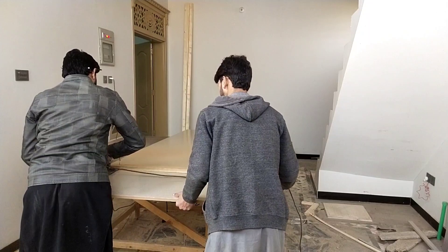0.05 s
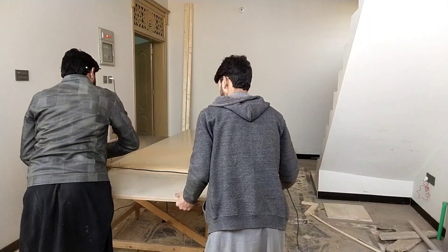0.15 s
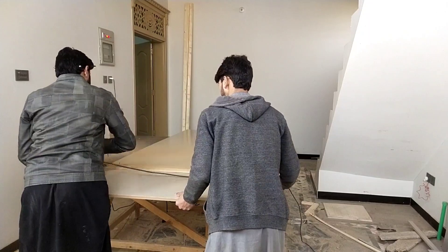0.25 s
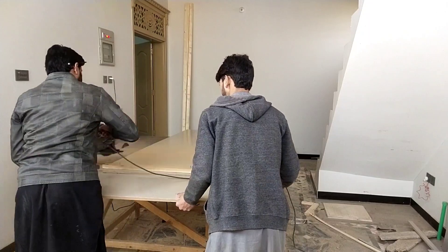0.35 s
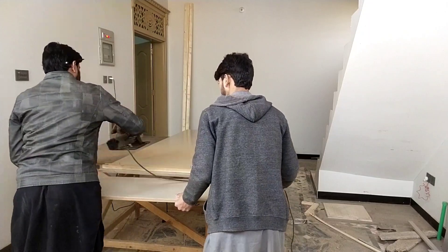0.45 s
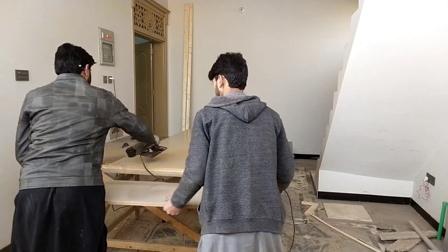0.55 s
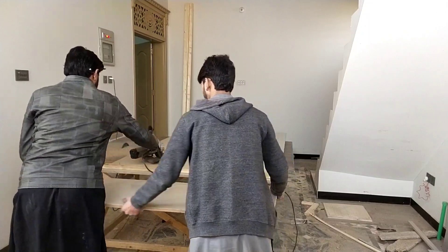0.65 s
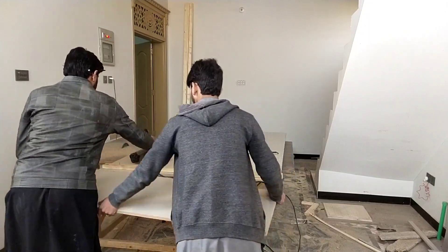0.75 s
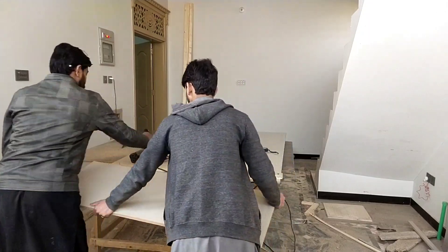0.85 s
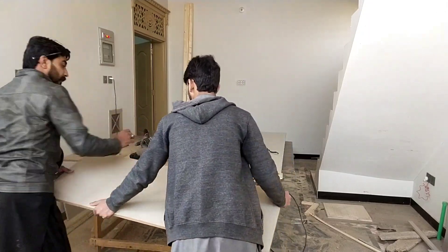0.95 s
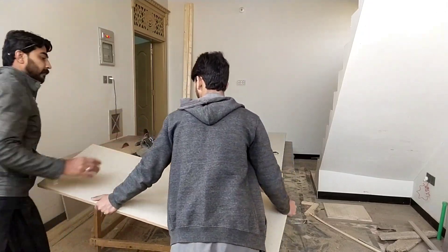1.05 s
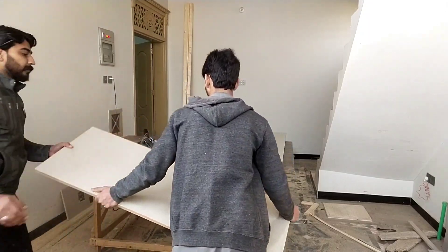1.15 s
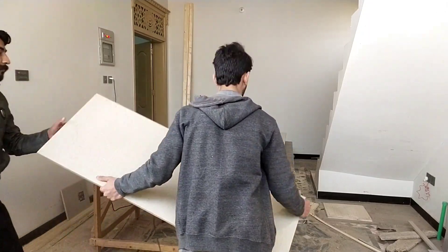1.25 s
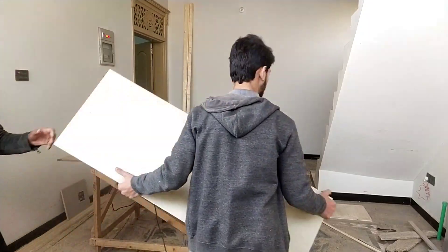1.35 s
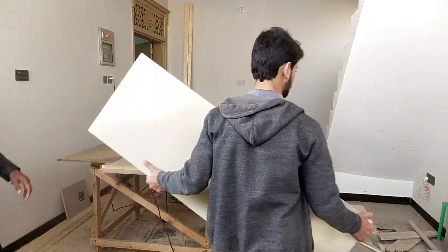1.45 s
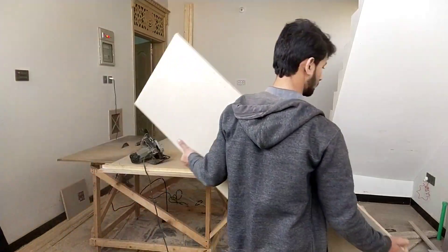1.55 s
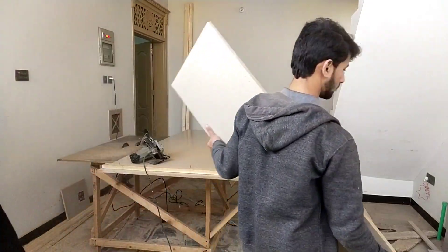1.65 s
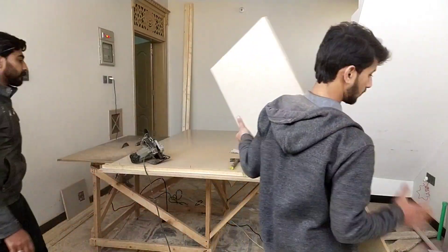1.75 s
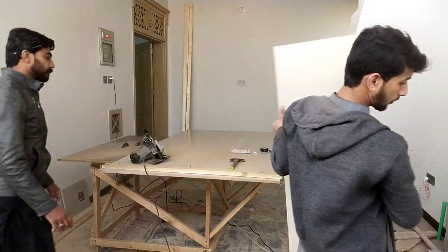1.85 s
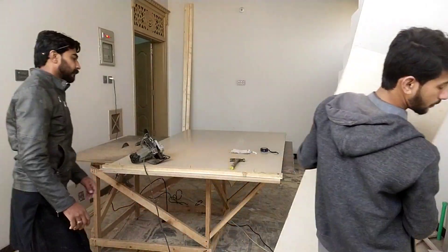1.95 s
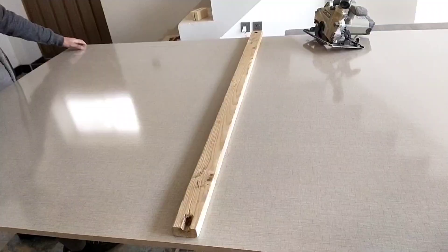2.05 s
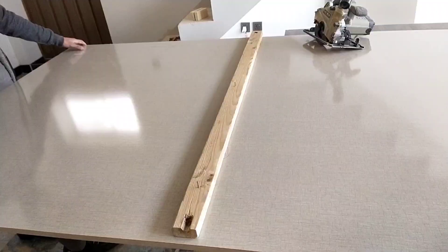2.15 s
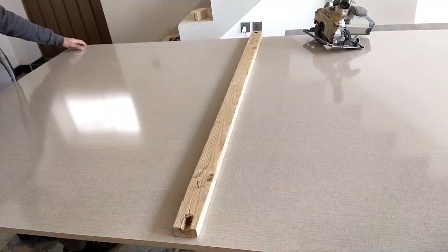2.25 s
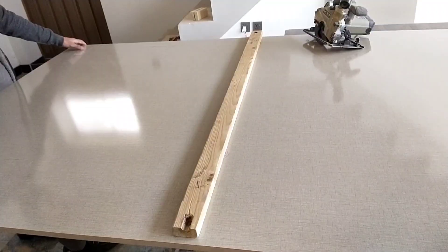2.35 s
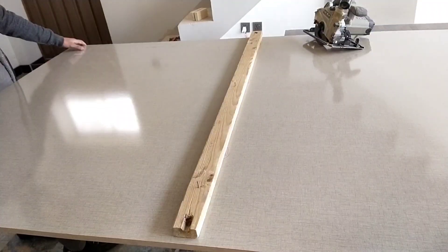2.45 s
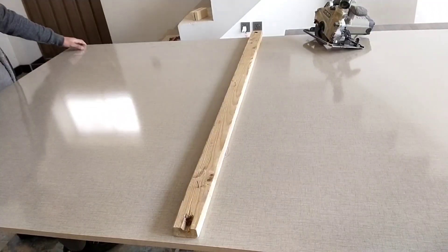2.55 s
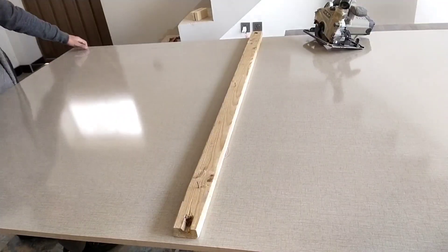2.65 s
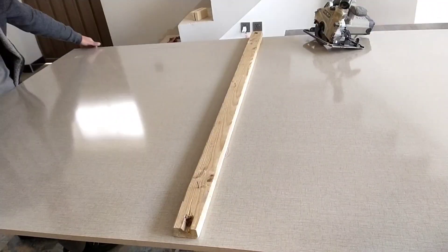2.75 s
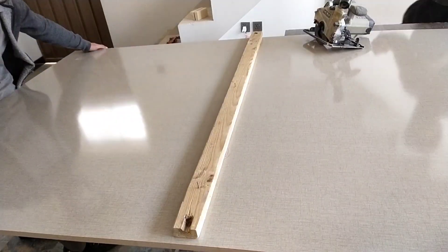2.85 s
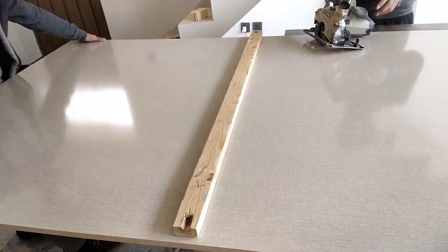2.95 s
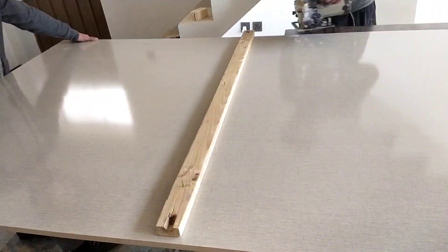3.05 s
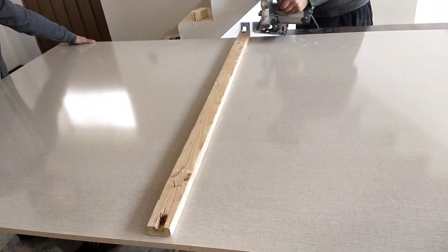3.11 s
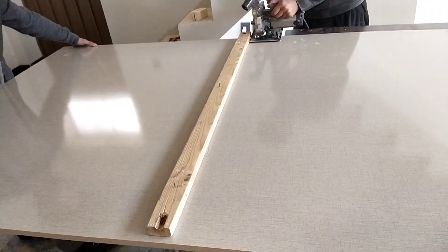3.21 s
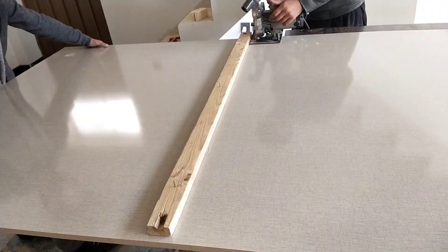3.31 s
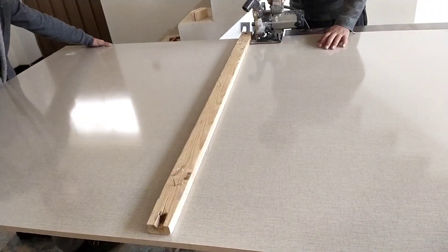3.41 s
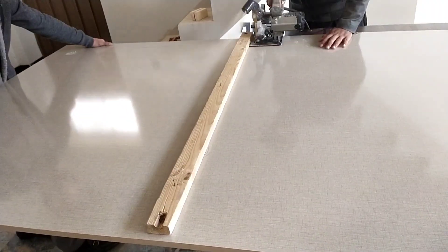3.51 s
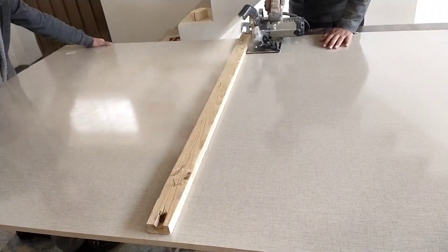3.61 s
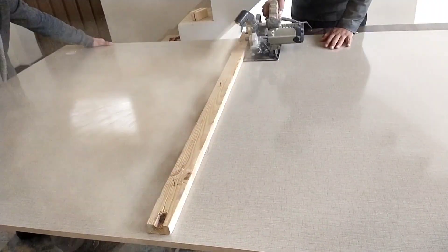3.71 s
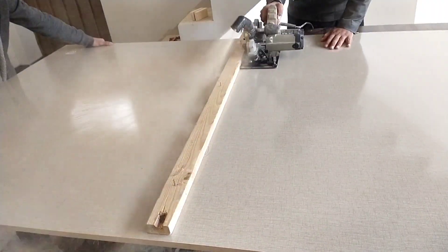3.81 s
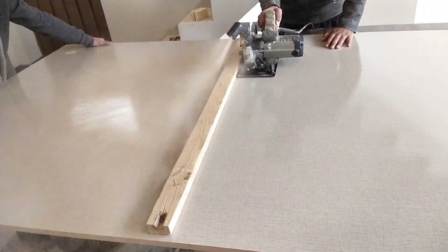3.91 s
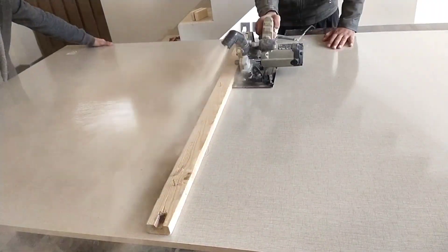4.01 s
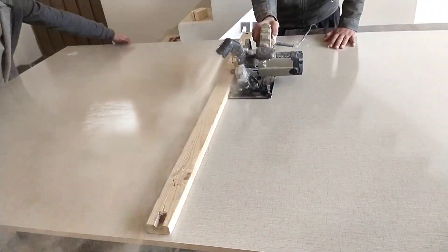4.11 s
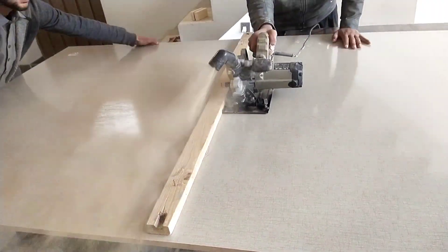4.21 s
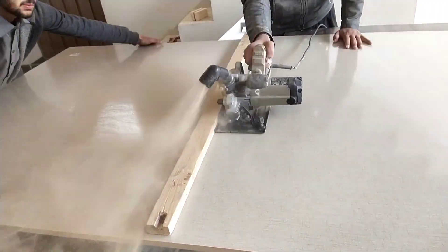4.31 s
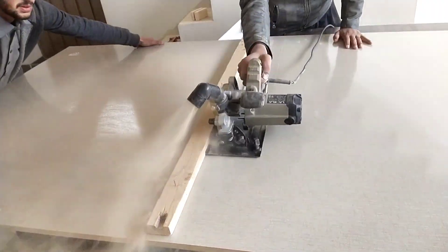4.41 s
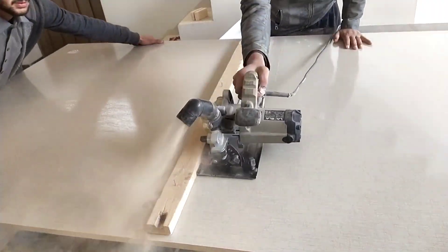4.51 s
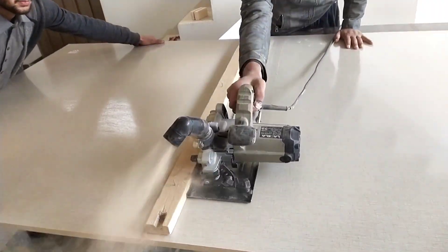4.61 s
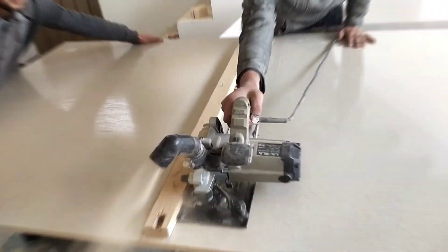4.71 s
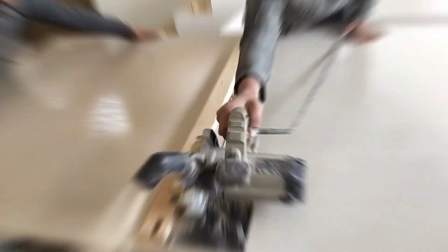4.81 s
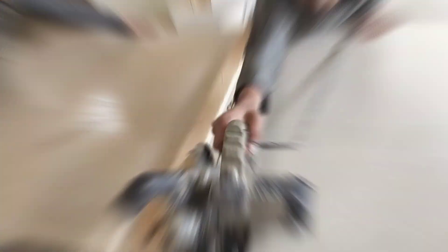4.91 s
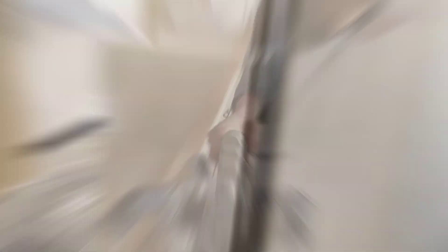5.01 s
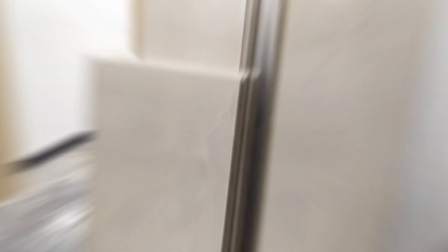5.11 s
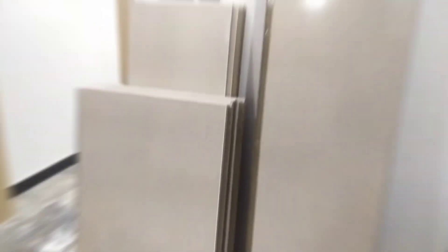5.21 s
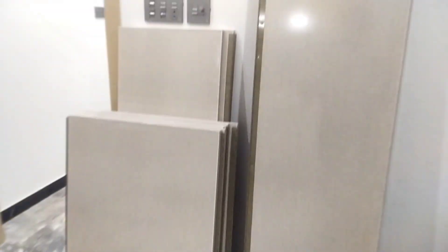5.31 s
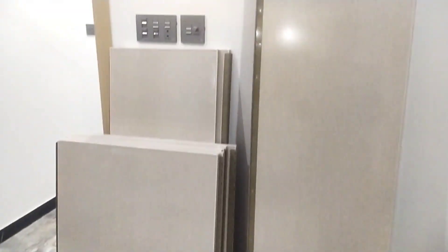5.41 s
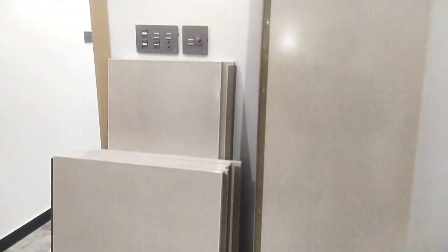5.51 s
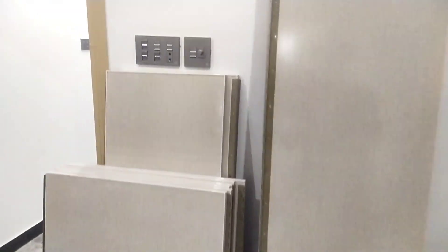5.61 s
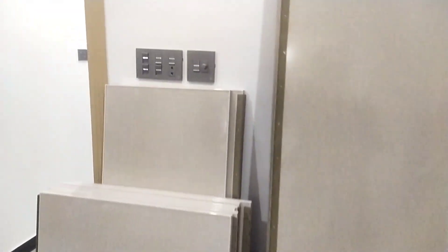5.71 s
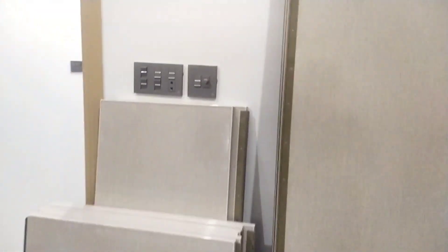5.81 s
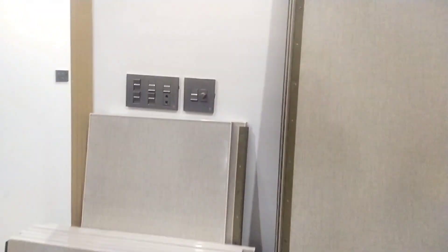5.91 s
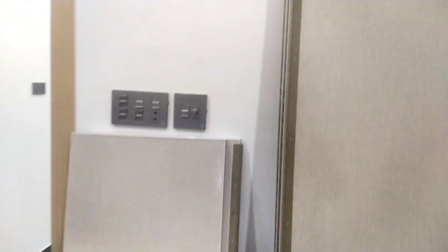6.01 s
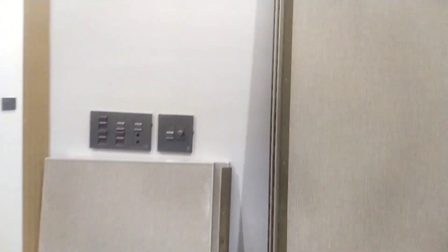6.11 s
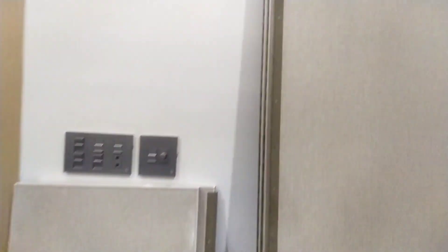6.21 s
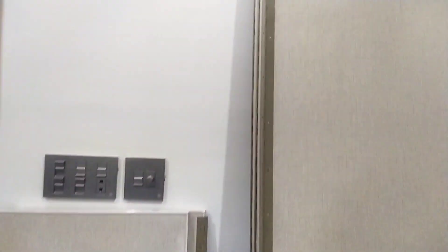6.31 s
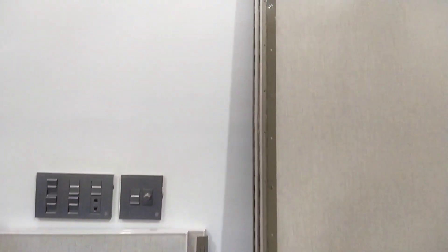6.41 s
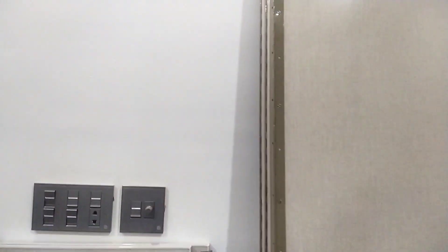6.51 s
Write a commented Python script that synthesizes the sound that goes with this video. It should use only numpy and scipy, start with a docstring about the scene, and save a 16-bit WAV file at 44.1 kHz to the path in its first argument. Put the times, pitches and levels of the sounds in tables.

```python
"""A hand-held circular saw is modelled as tooth-strike noise exciting panel and blade modes, with shaft-order tones.
It finishes a cut in a bare room and coasts on fan rush and gear rattle while the panel is carried off in rumbling noise.
The scene changes abruptly: swept sines chirp as a faint bird, noise bursts clatter as the saw meets the panel, and it
starts and cuts through: teeth rasp, the panel rumbles, the steel blade sings. It coasts again, a board thumps as
a decaying sine, and a sharp clack rings through the room over quiet noise."""
import sys
import numpy as np
from scipy import signal
from scipy.fft import rfft, irfft, next_fast_len
from scipy.io import wavfile
from scipy.ndimage import map_coordinates

SR = 44100
rng = np.random.default_rng(int(sys.argv[2]) if len(sys.argv) > 2 else 0)


def transcribe(signal):
    """Save signal, clipped to [-1, 1], as a 16-bit WAV file at the path in sys.argv[1]."""
    frames = np.atleast_2d(signal).T
    limited = np.clip(frames, -1, 1)
    pcm = np.round(limited * 32767).astype(np.int16)
    wavfile.write(sys.argv[1], SR, pcm)


N = 289295
T = np.arange(N) / SR  # s


def amp(db):
    """Logarithmic level: decibels to amplitude gain."""
    return np.exp(np.asarray(db) * np.log(10) / 20)


def unit(x):
    """Power normalisation: scale to rms 1."""
    return x / np.sqrt(np.mean(x ** 2) + 1e-20)


def along(points, hz):
    """Logarithmic frequency scale: (f/Hz, value) points interpolated on it."""
    f, v = np.transpose(points)
    return np.interp(np.log(hz + 1), np.log(f + 1), v)


def wobble(rate):
    """Band-limited random process of rms 1: straight lines between `rate` random knots a second."""
    knots = rng.standard_normal(int(N * rate / SR) + 2)
    return unit(np.interp(T * rate, np.arange(len(knots)), knots))


def noise():
    """Incoherent white noise: two unrelated channels."""
    return rng.standard_normal((2, N))


def pan(left_db):
    """Interchannel level difference: channel gains for left minus right in dB."""
    return amp([[left_db / 2], [-left_db / 2]])


def filtered(x, response):
    """Linear filtering: the spectrum of x times a response of frequency."""
    m = next_fast_len(N + SR // 2)
    spectrum = rfft(x, m) * response(np.fft.rfftfreq(m, 1 / SR))
    return irfft(spectrum, m)[..., :N]


def coloured(x, spectrum):
    """Spectral shaping: x with the given colour, at rms 1."""
    return unit(filtered(x, lambda hz: amp(along(spectrum, hz))))


def swell(s, spread):
    """Gaussian envelope: a bell-shaped rise and fall around a time."""
    return np.exp(-np.minimum(((T - s) / spread) ** 2 / 2, 20))


def envelope(start, length, attack, t60):
    """Exponential decay: attack, hold until length is over, then an even fall in dB."""
    rise = np.clip((T - start) / attack, 0, 1)
    return rise * amp(-60 * np.clip((T - start - length) / t60, 0, 3))


def strokes(rows, attack, t60):
    """Incoherent summation: the powers of hand movements at (t/s, length/s, level/dB) add."""
    power = sum((amp(db) * envelope(s, length, attack, t60)) ** 2 for s, length, db in rows)
    return np.sqrt(power)


def blows(rows, spectrum, t60, lead):
    """Impact excitation: bursts at (t/s, level/dB) grow 60 dB in lead seconds and decay in the struck colour."""
    burst = 0
    for s, db in rows:
        distance = np.maximum((T - s) / t60, (s - T) / lead)
        burst = burst + amp(db - 60 * np.minimum(distance, 2))
    return burst * coloured(noise(), spectrum)


# Reverberation of the bare room: f/Hz, t60/s
REVERBERATION = [(100, 0.74), (500, 0.64), (2500, 0.9), (7000, 0.73), (15000, 1)]


def room(x, wet_db):
    """Reverberation: direct sound plus a tail decaying by frequency, at constant power."""
    hz, t, z = signal.stft(rng.standard_normal((2, SR)), SR, nperseg=256)
    decay = amp(-60 * t / along(REVERBERATION, hz)[:, None])
    tail = signal.istft(z * decay, SR, nperseg=256)[1]
    echo = signal.fftconvolve(np.atleast_2d(x), tail / np.linalg.norm(tail[0]), axes=1)[:, :N]
    return (x + amp(wet_db) * echo) / np.sqrt(1 + amp(2 * wet_db))


FRICTION = 36.4  # steady toll, turns per second lost each second


def shaft_speed(drive, spin_down_s):
    """Rotational dynamics: the loaded speed, then after release exponential drag plus steady friction."""
    release_s, top = drive[-1]
    toll = FRICTION * spin_down_s
    coast = (top + toll) * np.exp(-np.maximum(T - release_s, 0) / spin_down_s) - toll
    return np.where(T < release_s, np.interp(T, *np.transpose(drive)), np.maximum(coast, 1))


def shaft_angle(speed, flutter):
    """Phase accumulation: the slightly unsteady speed integrates to the motor shaft's angle."""
    return 2 * np.pi * np.cumsum(speed * (1 + flutter * wobble(90))) / SR


def whine(angle, width_hz):
    """Narrow-band modulation: random quadrature envelopes smear a tone of rms 1 over a narrow band."""
    return unit(wobble(width_hz) * np.cos(angle) + wobble(width_hz) * np.sin(angle))


TOOTH_ORDER, TEETH = 6.5, 40  # tooth strikes per motor turn, teeth on the blade
HOWL_HZ, HOWL_WIDTH_HZ = 2590, 57  # resonance of the blade in the kerf and its half width
# Colour of the teeth tearing chips: f/Hz, level/dB
RASP_COLOUR = [(240, -32.5), (400, -14), (1040, -11), (1340, -7), (1770, -6), (2750, -1), (3480, -6),
               (5000, -17.5), (5700, -10.5), (7200, -8.5), (8000, -25), (11700, -27.5), (15700, -32),
               (19800, -91)]
# Colour of the shaken panel: f/Hz, level/dB
PANEL_COLOUR = [(21, -68.5), (35, -41), (91, -9), (140, 2.5), (341, -1.5), (415, -1.5), (1030, -8.5),
                (1320, -8), (1800, -17), (2340, -25), (3960, -120)]
# Weaker partials of the loaded motor: multiples of the shaft
LOADED_MOTOR_ORDERS = [8, 9, 11, 12]


def cutting(rasp, rumble, ring, angle, place_s, teeth_db, fan_db):
    """Forced vibration: teeth tear chips from the panel; their strikes shake it and ring the blade."""
    tooth = TOOTH_ORDER * angle
    speed = np.gradient(angle) * SR / (2 * np.pi)  # turns per second
    # the blade runs slightly out of true and the wood resists unevenly
    bite = (1 + 0.024 * np.sin(tooth / TEETH)) * amp(0.84 * wobble(48))
    strikes = bite * (1 + 0.56 * np.cos(tooth))
    chips = rasp * coloured(strikes * noise(), RASP_COLOUR) * pan(2.0)
    shaking = bite * amp(1.4 * wobble(170) + 1.1 * wobble(35))
    panel = rumble * coloured(shaking * noise(), PANEL_COLOUR) * pan(-6.0)
    blade = steel(ring, strikes * noise(), speed, place_s, swell_db=2.5)
    # the tooth note swells when the load drags it down into the resonance
    resonance = 1 / np.hypot(1, (TOOTH_ORDER * speed - HOWL_HZ) / HOWL_WIDTH_HZ)
    teeth = amp(teeth_db) * resonance * np.sqrt(rasp * rumble) * whine(tooth, width_hz=370)
    clear_note = amp(-8.5) * ring * whine(tooth, width_hz=80)
    # the fan whine grows with speed
    fan = amp(fan_db) * ring * (speed / speed.max()) ** 5 * whine(10 * angle, width_hz=60)
    motor = amp(-22) * ring * sum(whine(k * angle, width_hz=30) for k in LOADED_MOTOR_ORDERS)
    return chips + panel + blade + room(teeth + clear_note + fan + motor, wet_db=1.0)


# Modes of the steel blade, gripped differently along the cut:
# f/Hz, width/Hz, then relative level/dB on entry, under heavy load, midway, at the far edge
BLADE_MODES = [(3250, 17, 7, -2.5, 2.5, 6.5), (3560, 66, -15, -14, -15.5, -1.5), (4268, 54, 5, -4, 2, 5),
               (4480, 50, -1.5, -20, -7.5, -8.5), (4800, 110, -2.5, -18, -20, 0.5),
               (5040, 86, -17, -7, -27, -0.5), (5620, 65, 1.5, 5, 1.5, -14),
               (6110, 110, -0.5, -9.5, -4, -7.5), (6310, 400, -2, -3, -10.5, 1.5),
               (6710, 130, -6, 0, -6.5, -7), (7060, 95, 7, -0.5, 4.5, 3.5),
               (7475, 130, 0.5, -3.5, -1.5, -4), (8170, 33, -2, 2.5, -6.5, 0.5),
               (8730, 150, -1, -2, -1.5, 0), (9540, 100, -2.5, -3.5, -4, -1.5),
               (10270, 210, 1, -4, 1.5, -2.5), (11240, 110, -5, -8.5, -10.5, -4),
               (11350, 60, -12, -18, -11.5, -2), (11940, 110, -0.5, -4, 7.5, 3),
               (12650, 120, -4, -8, -10.5, -4), (13200, 140, -3.5, -5.5, -4.5, -0.5),
               (13500, 140, -5, 2.5, -2.5, 3), (14270, 110, -3, -6, -4.5, -5.5),
               (14660, 90, -9, -11, -9.5, -5.5), (15020, 78, -6, -10, 1.5, -2.5),
               (15540, 100, -4.5, -15.5, -11.5, -11)]
# When the blade reaches those four places: t/s
PLACE_TIMES = [3.53, 3.85, 4.7, 5.15]
# The guard throws the modes to different sides: f/Hz, left minus right level/dB
BLADE_SIDES = [(3200, 3.5), (4500, 1), (7200, -4.5), (9000, 3.5)]
GRIP_RATE = 14  # random changes a second of the kerf's grip
WORKING_SPEED = 450  # turns per second at which the modes have their listed pitch
STIFFENING, WANDER = .06, .0025  # pitch rise per share of speed, random share of pitch


def steel(level, strikes, speed, place_s, swell_db):
    """Modal synthesis: strikes ring every blade mode, which swells, sinks and bends as the kerf grips it."""
    on = level > amp(-60) * level.max()
    t, strikes, place_s = T[on], strikes[:, on], np.broadcast_to(place_s, N)[on]
    knots = np.arange(256)

    def chance():
        return np.interp(t * GRIP_RATE, knots, rng.standard_normal(len(knots)))

    ring, song = np.zeros((2, len(t))), np.zeros((2, N))
    for hz, width, *levels_db in BLADE_MODES:
        # two like resonators in a row keep the valleys between the modes dark
        quality = hz / width * np.sqrt(np.sqrt(2) - 1)
        resonator = np.concatenate(signal.iirpeak(hz, quality, SR))
        vibration = signal.sosfilt([resonator, resonator], strikes)
        grip = amp(np.interp(place_s, PLACE_TIMES, levels_db) + swell_db * chance())
        # spin stiffens the disc: reading the ringing faster raises the mode
        clock = np.cumsum(1 + STIFFENING * (speed[on] / WORKING_SPEED - 1) + WANDER * chance())
        mode = [map_coordinates(side, [clock], mode="mirror") for side in vibration]
        ring += grip * np.array(mode) * pan(along(BLADE_SIDES, hz))
    song[:, on] = unit(ring)
    return level * song


# Narrow tones of the saw: t/s, spread/s, f/Hz, level/dB before the wavering and room
SAW_TONES = [(.012, 0.019, 2873, -15.5), (0.09, 0.017, 2857, -18), (.14, 0.16, 4280, -33),
             (0.02, 0.019, 1502, -35.5), (0.06, 0.04, 3210, -33), (0.23, 0.061, 3580, -31),
             (3.565, 0.016, 3110, -19.5), (3.629, 0.0064, 2796, -14), (3.655, 0.014, 2825, -22),
             (3.642, 0.0064, 5530, -25), (3.677, 0.008, 5560, -28), (3.703, 0.0032, 2807, -15.5),
             (3.724, 0.01, 1340, -21.5), (3.78, 0.0076, 5494, -22), (3.814, 0.01, 5460, -22),
             (3.87, 0.01, 5494, -34), (3.881, 0.089, 1350, -39.5), (3.936, 0.0049, 1348, -22.5),
             (4.509, 0.012, 2858, -22), (4.59, 0.019, 2865, -23), (4.721, 0.0081, 2860, -23.5),
             (5.26, 0.0094, 3290, -28), (5.28, 0.2, 3230, -36), (5.385, 0.026, 3212, -23),
             (5.55, 0.073, 3570, -34), (5.55, 0.12, 1607, -35.5)]


def singing():
    """Frequency and amplitude modulation: the saw sings in narrow, wavering tones, in the kerf and running free."""
    drift = np.cumsum(1 + 0.011 * wobble(110)) / SR
    song = np.zeros(N, complex)
    for s, spread, hz, db in SAW_TONES:
        size = swell(s, spread)
        on = size > .001
        song[on] += amp(db) * size[on] * np.exp(2j * np.pi * hz * drift[on])
    song *= amp(2.0 * wobble(70))  # the level wavers
    # the two channels are a quarter cycle out of step
    return room(np.array([song.imag, song.real]), wet_db=-4.5) * pan(3.1)


FREE_SPEED = 515  # unloaded motor, turns per second
# Whines of the coasting motor: multiple of the shaft, level/dB at free speed before the housing,
# lowest and highest speed/(turns per second), width/Hz
MOTOR_WHINES = [(0.979, -42, 196, 520, 22), (4.3, -28.5, 100, 140, 20), (7.13, -37.5, 345, 940, 200),
                (9.85, -21, 343, 520, 140), (14.1, -28, 145, 590, 330), (21.53, -28, 122, 250, 420)]
# Resonances of the housing: f/Hz, half width/Hz, level/dB
HOUSING_MODES = [(242, 89, -1), (501, 78, 1), (652, 61, -0.5), (2357, 220, 7.5), (3080, 130, -2),
                 (3620, 240, -7.5), (4090, 220, -4), (4740, 220, -4), (5210, 165, -1), (6400, 450, -12.5)]
WHINE_POWER, DIES_DB_PER_OCTAVE = 1.28, 47  # power of speed, loss outside a whine's own speeds


def whines(speed, angle):
    """Order tones through resonances: whines fade with speed and linger on each housing mode they cross."""
    def housing(hz):
        power = 0
        for centre, width, db in HOUSING_MODES:
            power = power + amp(2 * db) / (1 + ((hz - centre) / width) ** 2) ** 2
        return np.sqrt(power)

    tones = 0
    for order, db, low, high, width in MOTOR_WHINES:
        octaves_outside = np.abs(np.log2(speed / np.clip(speed, low, high)))
        in_range = amp(-DIES_DB_PER_OCTAVE * octaves_outside)
        tones = tones + amp(db) * in_range * whine(order * angle, width)
    return filtered((speed / FREE_SPEED) ** WHINE_POWER * tones, housing)


def coasting(rush, rattle, angle, fan, gears, left_db):
    """Amplitude-modulated noise: with the load gone the fan rushes and slack gears rattle once a turn."""
    backlash = (1 + .5 * np.cos(angle)) * amp(0.53 * wobble(130))
    air = rush * coloured(backlash * noise(), fan) * pan(left_db)
    return air + rattle * coloured(backlash * noise(), gears)


# First run under power until the trigger is released: t/s, speed/(turns per second)
FIRST_DRIVE = [(.1, 468), (.21, 510), (.25, 510)]
# Colour of the fan: f/Hz, level/dB
FAN_COLOUR = [(530, -23.5), (900, -5), (1290, -6), (1490, -22), (1680, -1), (2770, -5), (4370, -2),
              (5170, -2.5), (5760, -7.5), (6970, -7), (8450, -17), (14000, -20.5), (15700, -34.5)]
# Colour of the gears in the first run: f/Hz, level/dB
FIRST_GEARS_COLOUR = [(120, -32.5), (200, -29.5), (265, -28.5), (354, -9), (554, -0.5), (741, 7), (951, 4),
                      (1100, -7.5), (1340, -6), (1470, 7.5), (1690, 7), (2400, -7), (3120, -48),
                      (5280, -120)]
FREED_S = 0.14  # the blade comes free
CRITICAL_SPEED, CRITICAL_SPREAD = 409, 47.5  # where the gears shudder, turns per second
SCENE_CHANGE = 2.0  # s


def first_run():
    """Load release: the blade leaves the wood, races briefly and winds down."""
    speed = shaft_speed(FIRST_DRIVE, spin_down_s=1.374)
    angle = shaft_angle(speed, flutter=0.00542)
    in_wood = amp(-60 * np.clip((T - FREED_S) / 0.44, 0, 2))
    cut = cutting(amp(-32.0) * in_wood, amp(-53.5) * in_wood, amp(-27.5) * in_wood, angle,
                  PLACE_TIMES[2], teeth_db=-4, fan_db=-10.5)
    # fan and gears fade with the speed, and both swell around the critical speed
    freed = np.clip((T - FREED_S) / 0.11, 0, 1)
    shudder = np.exp(-((speed - CRITICAL_SPEED) / CRITICAL_SPREAD) ** 2 / 2)
    rush = freed * amp(-25.0 + 2 * shudder) * (speed / FREE_SPEED) ** 1.46
    rattle = freed * amp(-31.5 + 10 * shudder) * (speed / FREE_SPEED) ** 1.51
    coast = coasting(rush, rattle, angle, FAN_COLOUR, FIRST_GEARS_COLOUR, left_db=-0.2)
    return cut + coast + room(freed * whines(speed, angle), wet_db=2.0) + knocks(0, SCENE_CHANGE)


# Second cut, s: teeth touch the edge, the sole plate lands, the blade breaks out, the trigger is released
TOUCH_S, SEATED_S, BREAK_OUT_S, RELEASE_S = 3.355, 3.53, 5.3, 5.4
ENTRY_END_S, SETTLE_S = 3.608, 0.14  # the loud entry holds until, then settles with this time constant
NEAREST_S, NEAREST_SPREAD_S = 4.8, 0.072  # the blade passes nearest
FAR_EDGE_S, FAR_EDGE_SPREAD_S = 5.13, 0.37  # it nears the far edge
# The hand eases its push and the rumble sinks: t/s, spread/s, level/dB
PUSH_EASES = [(3.49, 0.017, -14), (3.883, 0.0089, -7), (4.41, 0.029, -6), (5.022, 0.019, -14),
              (5.176, 0.046, -10.5)]


def long_cut(angle):
    """Load-dependent excitation: a hard entry, settling in the kerf, then a louder rasp near the far edge."""
    entry = np.exp(-np.maximum(T - ENTRY_END_S, 0) / SETTLE_S)
    nearest = swell(NEAREST_S, NEAREST_SPREAD_S)
    far_edge = swell(FAR_EDGE_S, FAR_EDGE_SPREAD_S)
    wood_s = BREAK_OUT_S - TOUCH_S
    rasp_in_wood = envelope(TOUCH_S, wood_s, attack=0.078, t60=1.0)
    ring_in_wood = envelope(TOUCH_S, wood_s, attack=0.099, t60=1.0) ** 3
    rasp = amp(-34.5 + 12 * entry + 1.0 * far_edge - 2.7 * nearest) * rasp_in_wood
    ring = amp(-30.0 + 8.5 * entry + 1.5 * nearest) * ring_in_wood
    # the panel rumbles fully once the sole plate presses on it
    push_db = 9.1 * np.exp(-np.maximum(T - SEATED_S - .13, 0) / 0.076)
    push_db = push_db + sum(db * swell(s, spread) for s, spread, db in PUSH_EASES)
    pressed = envelope(SEATED_S, BREAK_OUT_S - SEATED_S, attack=0.082, t60=0.14)
    touching = envelope(TOUCH_S, wood_s, attack=0.022, t60=0.1)
    rumble = amp(-35.5 + push_db) * (pressed + amp(-10.5) * touching)
    return cutting(rasp, rumble, ring, angle, T, teeth_db=-1.0, fan_db=-11.5)


# Second run under power until the trigger is released: t/s, speed/(turns per second)
SECOND_DRIVE = [(3.34, 432.8), (3.55, 490.6), (3.7, 409.2), (4.0, 399.6), (4.35, 398.5), (4.48, 434.7),
                (4.8, 455.4), (5.05, 488), (5.37, 504.8)]
# Colour of the fan running out: f/Hz, level/dB
RUN_OUT_COLOUR = [(530, -35.5), (900, -20), (1420, -14), (1600, -1), (2320, -7), (2710, -3.5), (2980, -8.5),
                  (3610, -5.5), (5620, -17), (6650, -14), (8340, -34.5), (13000, -42), (15700, -42)]
# Colour of the gears in the second run: f/Hz, level/dB
SECOND_GEARS_COLOUR = [(88, -21), (150, -13), (237, -11.5), (371, -1.5), (487, -8.5), (837, -4),
                       (919, -8.5), (1400, -5), (1820, -6), (3080, -120)]
# The saw jolts the panel: t/s, peak level/dB of the burst envelope
PANEL_JOLTS = [(3.385, -27.5), (3.554, -24), (3.585, -31), (3.627, -24.5), (3.7, -21), (3.77, -26),
               (3.84, -36), (3.908, -27), (3.983, -29), (4.035, -33), (4.882, -28.5), (4.958, -23.5),
               (4.985, -23.5), (5.1, -29.5), (5.2, -36.5), (5.29, -29), (5.416, -25.5)]


def second_run():
    """Start, load and run-down: the saw is set down, started, pushed through the panel and released."""
    angle = shaft_angle(shaft_speed(SECOND_DRIVE, spin_down_s=.6), flutter=0.00804)
    # the fan roars as the motor starts, and is heard again when the blade leaves the wood
    start = amp(-22.5) * envelope(TOUCH_S, 0.081, attack=0.042, t60=0.3)
    leaving = amp(-28) * envelope(BREAK_OUT_S, 0.17, attack=0.062, t60=0.3)
    roar = (start + leaving) * coloured(noise(), FAN_COLOUR)
    rush = amp(-23) * envelope(RELEASE_S, 0.14, attack=0.033, t60=0.86)
    rattle = amp(-38.5) * envelope(RELEASE_S, 0.17, attack=0.031, t60=1.71)
    coast = coasting(rush, rattle, angle, RUN_OUT_COLOUR, SECOND_GEARS_COLOUR, left_db=4.5)
    falling_tone = amp(-30.5) * swell(5.475, 0.05) * whine(10 * angle, width_hz=90)
    falling = room(falling_tone, wet_db=-1) * pan(3.8)
    jolts = blows(PANEL_JOLTS, PANEL_COLOUR, t60=0.092, lead=0.018) * pan(-3.3)
    return knocks(SCENE_CHANGE, N / SR) + roar + long_cut(angle) + coast + falling + jolts + thump()


THUMP_S = 5.408  # the offcut drops
THUMP_HZ, THUMP_DB, THUMP_T60_S = 117, -26, .05


def thump():
    """Damped oscillation: the offcut lands with one deep, quickly decaying sine."""
    age = np.clip(T - THUMP_S, 0, 1)
    decay = amp(THUMP_DB - 60 * age / THUMP_T60_S)
    return decay * np.sin(2 * np.pi * THUMP_HZ * age) * pan(-2.7)


# Tools and boards knocking: t/s, crack level/dB, low body level/dB, both before the room
TOOL_KNOCKS = [(1.113, -32, -60), (2.684, -47, -69), (2.781, -34.5, -63), (2.828, -30.5, -67),
               (2.864, -29.5, -54), (3.128, -60, -71), (3.248, -53.5, -46)]
# Colour of the crack: f/Hz, level/dB
KNOCK_COLOUR = [(71, -45), (120, -12), (347, -7.5), (471, -1.5), (768, -4), (962, -3.5), (2270, -6.5),
                (5560, -18), (6680, -12.5), (7550, -28.5), (15700, -31)]
# Colour of low knocks and of the sliding panel: f/Hz, level/dB
SLIDE_COLOUR = [(21, -40), (35, -20), (91, -1), (216, 1), (242, 0.5), (279, -4.5), (567, -4), (693, -11.5),
                (1100, -8.5), (1430, -35), (2420, -120)]


def knocks(first, last):
    """Impact radiation: tools and boards knock between two times, each a crack and a low body."""
    rows = [row for row in TOOL_KNOCKS if first <= row[0] < last]
    crack = blows([(s, db) for s, db, body_db in rows], KNOCK_COLOUR, t60=.1, lead=.025)
    body = blows([(s, body_db) for s, db, body_db in rows], SLIDE_COLOUR, t60=0.047, lead=0.019)
    return room(crack + body, wet_db=-8.0)


# The panel slides and flexes in the hands: t/s, length/s, level/dB
PANEL_SLIDES = [(0.464, 0.26, -50), (0.688, 0.051, -40.5), (0.807, 0.5, -48), (1.063, 0.17, -48.5),
                (1.522, 0.41, -51.5), (1.838, 0.021, -52), (2.626, 0.071, -60.5), (2.884, 0.026, -55.5),
                (3.16, 0.066, -51)]


def handling(rows, colour):
    """Friction noise: boards slide and flex with a low, uneven rumble."""
    uneven = amp(1.1 * wobble(35)) * noise()
    return strokes(rows, attack=0.014, t60=0.75) * coloured(uneven, colour)


# Hard clacks by the wall: t/s, peak level/dB of the burst envelope before the room
WALL_CLACKS = [(5.983, -22), (5.996, -14), (6.008, -21.5)]
# Colour of the clacks: f/Hz, level/dB
CLACK_COLOUR = [(410, -50), (700, -30), (808, -35), (920, -31), (1080, -41), (1350, -9), (2000, -3),
                (2600, -0.5), (3470, -12), (4750, -4), (5850, -11), (6750, -6.5), (8420, -18.5),
                (14000, -23), (15700, -29.5)]
# Boards shifted on the stack: t/s, length/s, level/dB
BOARD_SHIFTS = [(5.79, 0.3, -58.5), (6.2, 0.27, -66.5), (6.41, 0.16, -48.5)]
# Colour of the shifted boards: f/Hz, level/dB
BOARD_COLOUR = [(24, -82.5), (40, -54), (59, -34), (129, -4), (172, -13), (290, -2), (366, -23),
                (507, -8.5), (900, -19.5), (1170, -27), (1980, -120)]


def stacking():
    """Impulse response: a hard clack excites the whole room while boards are shifted."""
    clacks = blows(WALL_CLACKS, CLACK_COLOUR, t60=0.019, lead=0.003)
    return room(clacks, wet_db=9.0) * pan(4.1) + handling(BOARD_SHIFTS, BOARD_COLOUR)


# A dragged board judders and groans: t/s, length/s, f/Hz, level/dB before the room
BOARD_GROANS = [(0.706, 0.054, 174, -46), (1.06, .1, 79.6, -53), (1.168, 0.16, 113.3, -50.5),
                (1.843, 0.026, 183.4, -51), (6.012, 0.29, 282.6, -64), (6.4, 0.068, 291.4, -52.5)]


def groans():
    """Stick-slip friction: a dragged board groans at a low, rough pitch."""
    hum = 0
    for s, length, hz, db in BOARD_GROANS:
        size = amp(db) * envelope(s, length, attack=0.018, t60=0.19)
        hum = hum + size * whine(2 * np.pi * hz * T, width_hz=35)
    return room(hum, wet_db=-8)


# A hard edge drags: t/s, length/s, level/dB
EDGE_SCRAPES = [(2.06, 0.062, -62.5), (2.25, 0.044, -68), (2.37, 0.095, -70.5), (2.49, .04, -67),
                (2.63, 0.0696, -57), (2.98, .09, -56.5), (5.8, 0.16, -44.5), (6.36, 0.13, -56.5),
                (6.45, 0.12, -39.5)]
# Colour of the dragging edge: f/Hz, level/dB
EDGE_COLOUR = [(710, -31), (1200, -16.5), (2440, -2.5), (3060, -5.5), (6580, -9), (15700, -20)]


def scrapes():
    """Roughness noise: a hard edge drags over a dusty surface."""
    rough = amp(1.3 * wobble(120)) * noise()
    return strokes(EDGE_SCRAPES, attack=0.1, t60=0.18) * coloured(rough, EDGE_COLOUR)


# A bird outside: t/s, length/s, f/Hz, level/dB before the room
BIRD_CHIRPS = [(2.171, 0.063, 2880, -74), (2.18, .06, 4000, -78), (2.265, 0.06, 2870, -66),
               (2.267, 0.064, 3880, -69), (2.382, 0.039, 4060, -66), (2.412, 0.043, 2830, -66),
               (2.48, 0.074, 2770, -72), (2.483, 0.054, 3780, -72.5)]


def bird():
    """Frequency modulation: short falling chirps, blurred by the room."""
    song = np.zeros(N)
    for s, length, hz, db in BIRD_CHIRPS:
        u = np.clip((T - s) / length, 0, 1)
        pitch = hz * (1.02 - .04 * u + .012 * wobble(220))
        song += amp(db) * np.sin(np.pi * u) * np.sin(2 * np.pi * np.cumsum(pitch) / SR)
    return room(song, wet_db=-3)


FLOOR_DB = -67  # rms level
# Colour of the quiet room tone: f/Hz, level/dB
FLOOR_COLOUR = [(18, -52.5), (30, -23.5), (85, -12), (135, 4), (200, -3), (734, -10.5), (2800, -15),
                (5820, -25.5), (6630, -22), (8840, -36), (13800, -31.5), (15700, -31.5)]


def room_tone():
    """Stationary background noise: a steady, quiet coloured hiss and rumble."""
    return amp(FLOOR_DB) * coloured(noise(), FLOOR_COLOUR)


def scene():
    """Superposition: the first run breaks off abruptly and the second follows, over quiet room tone."""
    later = np.clip((T - SCENE_CHANGE) / .008 + .5, 0, 1)  # 8 ms crossfade
    early_slides = [row for row in PANEL_SLIDES if row[0] < SCENE_CHANGE]
    late_slides = [row for row in PANEL_SLIDES if row[0] > SCENE_CHANGE]
    before = first_run() + handling(early_slides, SLIDE_COLOUR)
    after = second_run() + handling(late_slides, SLIDE_COLOUR) + stacking() + scrapes() + bird()
    return (1 - later) * before + later * after + singing() + groans() + room_tone()


TOP_HZ = 15750  # band limit


def record(dry):
    """Band limitation: nothing above the band limit passes."""
    return filtered(dry, lambda hz: hz < TOP_HZ)


dry = scene()
out = record(dry)
transcribe(out)
```